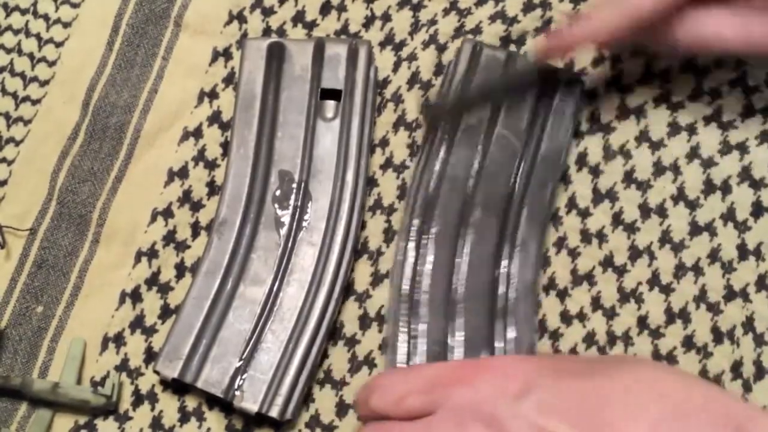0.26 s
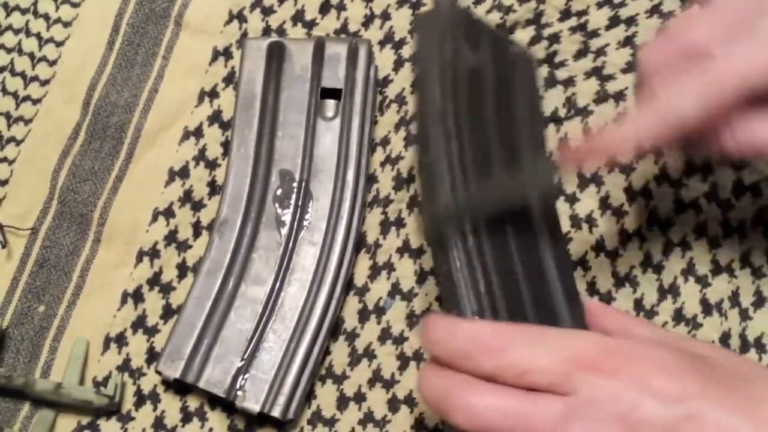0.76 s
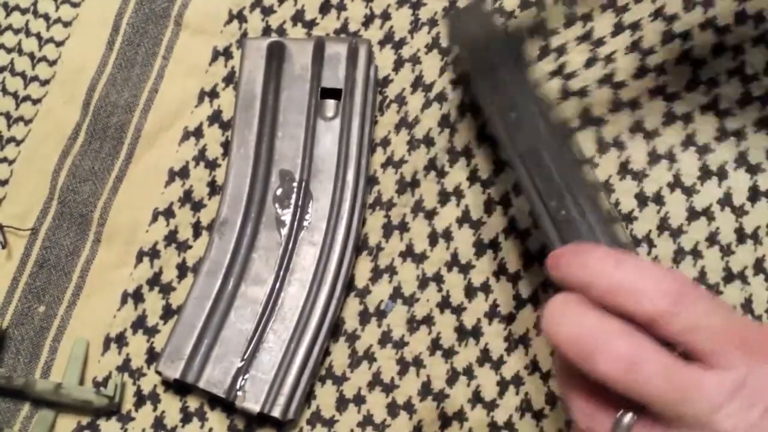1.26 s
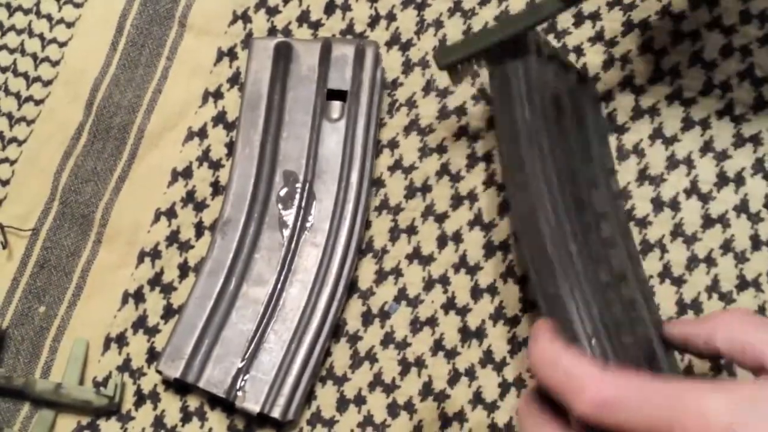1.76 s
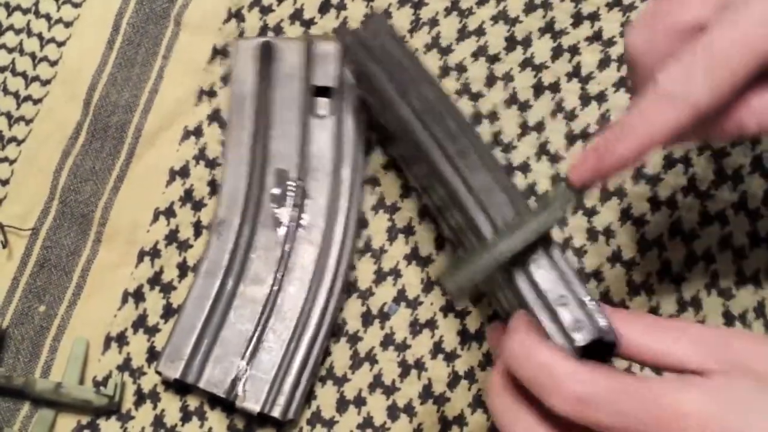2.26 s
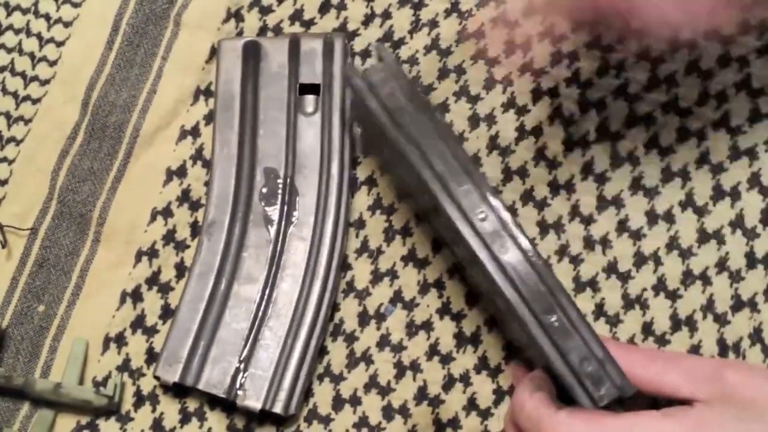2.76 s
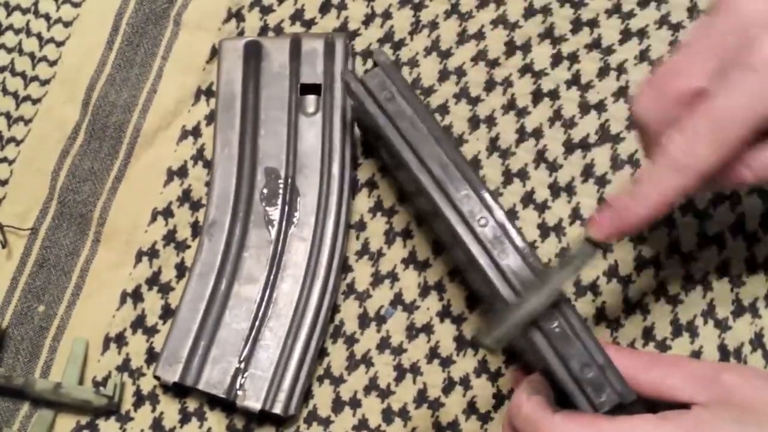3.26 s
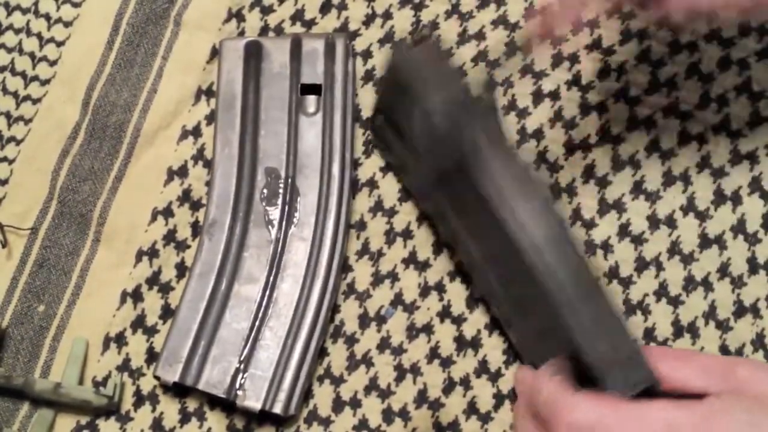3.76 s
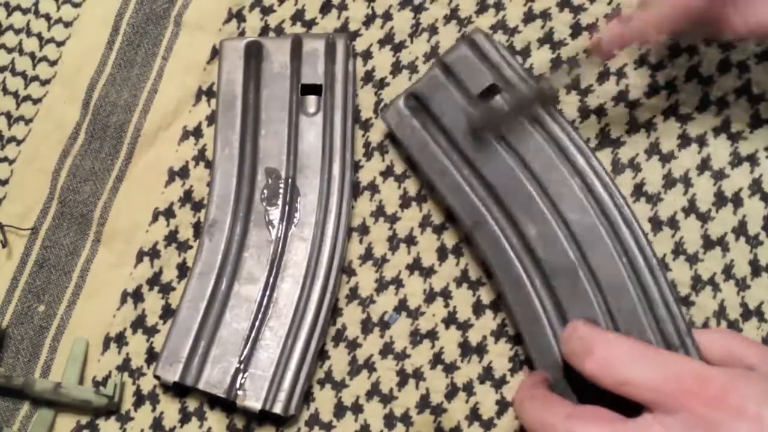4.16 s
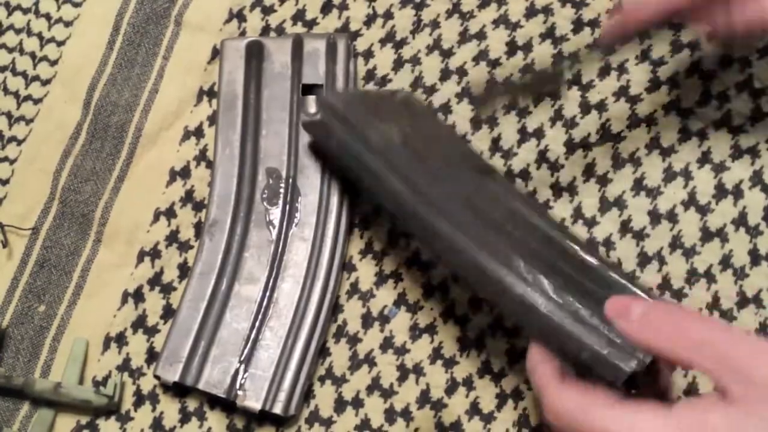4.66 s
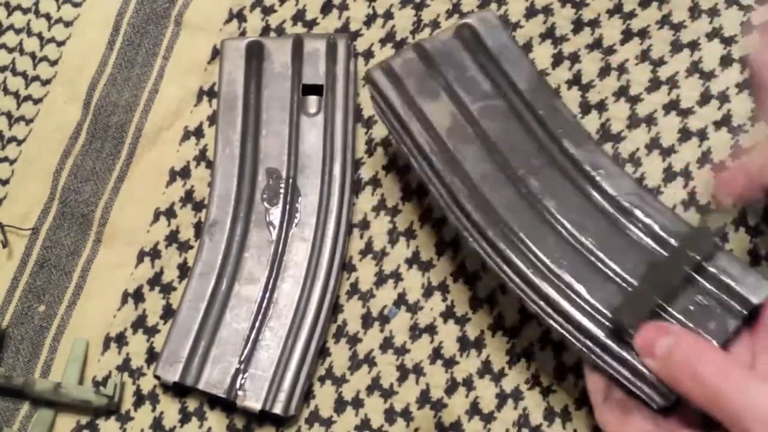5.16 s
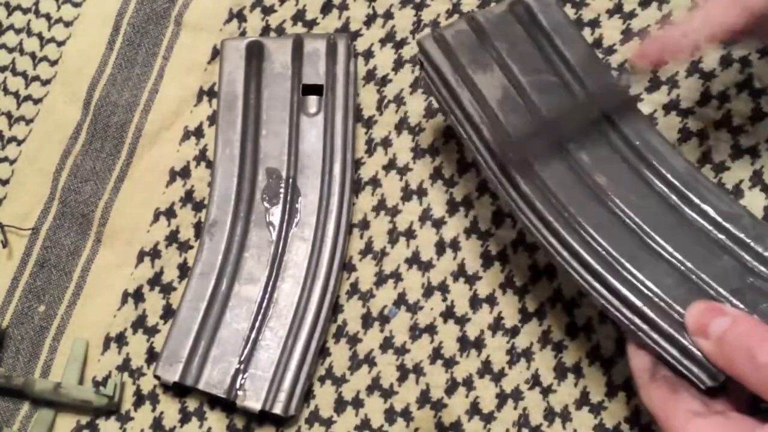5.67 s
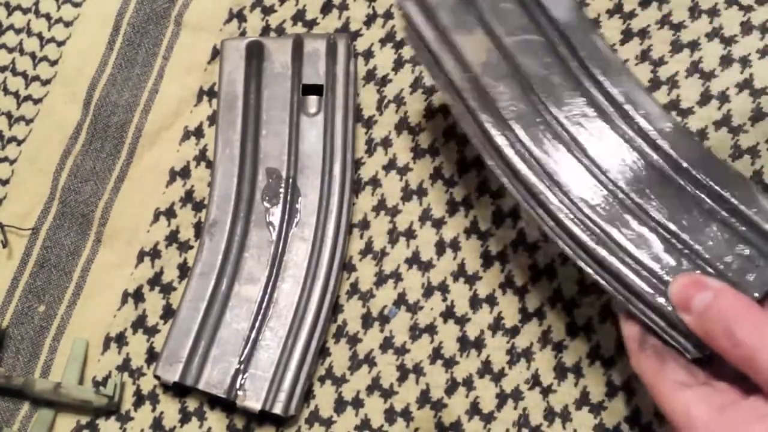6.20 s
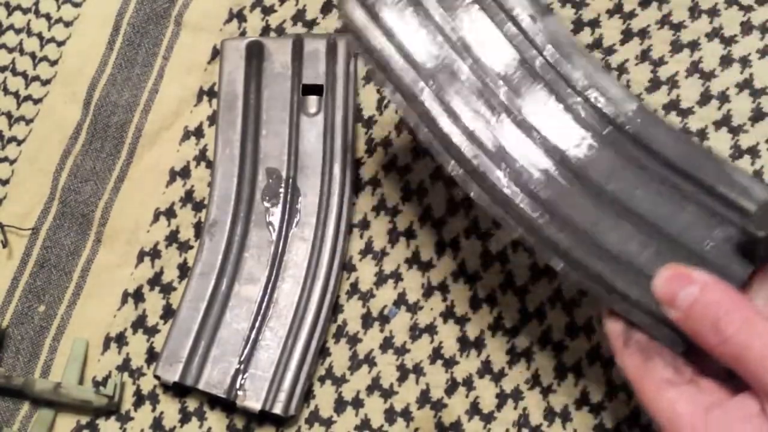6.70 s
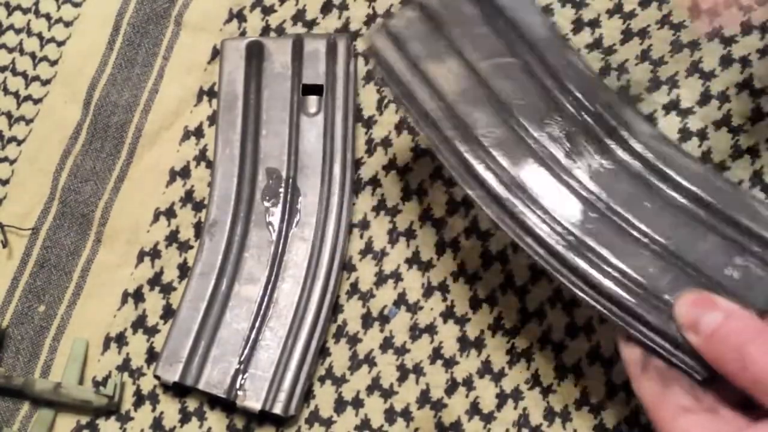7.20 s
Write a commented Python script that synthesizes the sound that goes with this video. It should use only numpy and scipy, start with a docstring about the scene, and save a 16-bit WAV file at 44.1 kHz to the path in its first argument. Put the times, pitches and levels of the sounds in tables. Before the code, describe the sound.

A stiff brush scrubs rapidly back and forth on a wet hollow metal case, with knocks, a clang and short clacks, close up indoors.

```python
"""Brushing a hollow metal magazine

A stiff brush scrubs a wet sheet-metal magazine, turned by hand on a cloth-covered table, in a small room.
Strokes are random bristle slips: each ticks and fizzes, and some ring the shell's modes (its ringing tones).
Short noise bursts make knocks and rim taps; coarser slips make drags. A second magazine clangs and grinds.
Around one clash the table thumps. Shaped noise makes its soft rumble and the faint room air.
A close stereo microphone hears it all, with a short room tail."""
import sys
import numpy as np
from scipy import signal
from scipy.fft import rfft, irfft
from scipy.io import wavfile

SR = 44100
rng = np.random.default_rng(int(sys.argv[2]) if len(sys.argv) > 2 else 0)


def unload_wav(signal):
    """Save mono or channel-first audio to the path in sys.argv[1] as 16-bit WAV at rate SR, clipped to [-1, 1]."""
    wavfile.write(
        sys.argv[1],
        SR,
        np.round(np.clip(np.atleast_2d(signal).T, -1, 1) * 32767).astype(np.int16),
    )


N = 328104  # length of the sound in samples
T = np.arange(N) / SR  # time in seconds


# brush strokes, each lasting until the next stroke or lift: (start [s], bristle hiss before trim [dB])
STROKE_STARTS = [(0.086, -37.5), (0.198, -36), (0.312, -38.5), (0.358, -27), (0.518, -33.5), (0.66, -33.5),
                 (0.821, -34.5), (0.957, -32.5), (1.106, -30.5), (1.246, -28.5), (1.404, -26.5),
                 (1.545, -32), (1.662, -36.5), (1.896, -51), (2.096, -45.5), (2.149, -53), (2.262, -29),
                 (2.381, -44), (2.557, -40.5), (2.683, -44.5), (2.831, -41.5), (2.957, -40.5),
                 (3.075, -35.5), (3.242, -45.5), (3.373, -33.5), (3.547, -31), (3.683, -31), (3.85, -47.5),
                 (4.148, -29), (4.306, -32.5), (4.448, -52), (4.788, -27.5), (4.905, -33), (5.035, -29.5),
                 (5.168, -34.5), (5.323, -29.5), (5.446, -39.5), (5.592, -28), (5.713, -34.5), (5.83, -22),
                 (6.016, -34.5), (6.183, -25), (6.693, -40.5), (6.852, -37.5), (6.952, -39.5),
                 (7.098, -34.5), (7.207, -38), (7.308, -36.5), (7.36, -26.5)]
# moments when the brush lifts off, so that the next stroke is a push: time [s]
BRUSH_LIFTS = [0.358, 1.876, 1.994, 2.215, 2.352, 3.829, 3.95, 4.57, 6.328, 6.848, 7.36, 7.458]
REVERSAL_S = 0.008  # the brush stands still between strokes


def strokes():
    """The hand goes to and fro: give the start, length, hiss level and direction of each stroke."""
    stops = [start for start, _ in STROKE_STARTS] + list(BRUSH_LIFTS)
    pushing = True
    for start, hiss_db in STROKE_STARTS:
        end = min(stop for stop in stops if stop > start)
        yield start, end - start - REVERSAL_S, hiss_db, pushing
        pushing = end in BRUSH_LIFTS or not pushing


# how freely the shell rings under the brush as the hand shifts its grip: (time [s], level [dB])
RING_FREEDOM = [(0.2, 3.5), (0.85, -5.5), (1.4, -3.5), (1.7, 5), (2.4, -10.5), (3.1, -1), (3.4, -13),
                (4.15, 1), (4.9, 0.5), (5.6, 2), (6.85, -2.5), (7.36, 2.5)]
# how strongly fine bristles excite each pitch, the high modes most: (frequency [Hz], level [dB])
FLICK_TONE = [(1000, -3), (1800, -0.5), (2800, 4), (5000, 6)]
# each way: swell from start to end [dB], shell ring over hiss before grip [dB], bite (under 1 peaks early)
PUSH, PULL = (-0.027, -2.3, 0.87), (0.76, -6.5, 0.77)
STROKE_ARCH = 0.95  # the force grows with the speed of the brush to this power
# a push with a knock this soon after its start fades by this much instead
LANDING_S, LANDING_SWELL_DB = 0.022, -12


def scrubbing(far_db=-10, spot_count=3, hiss_trim_db=-1.5, ringing_share=0.14):
    """Back and forth strokes: all slips hiss in the air, and a random share of them rings the shell."""
    out = np.zeros((2, N))
    for start, length, hiss_db, pushing in strokes():
        swell_db, ring_db, bite = PUSH if pushing else PULL
        if pushing and any(start < knock[0] < start + LANDING_S for knock in KNOCK_EVENTS):
            swell_db = LANDING_SWELL_DB
        free_db = value_at(RING_FREEDOM, start)
        force = friction(length, swell_db, rate=6000, grain_db=1.5, catch_db=1.6,
                         arch=STROKE_ARCH, bite=bite, catch_rate=211.5)
        # the tufts flutter as they cross the ribs
        flutter = undb(1.3 * wander(T[:len(force)], rate=55))
        force = force * flutter

        # the far row of bristles catches along with the near one, but flicks on its own
        near_hiss = bristles(force, length)
        far_force = force * rng.standard_normal(len(force))
        far_hiss = bristles(far_force, length, spot_count=1)
        hiss = near_hiss + undb(far_db) * far_hiss
        add(out, start, level(hiss, hiss_db + hiss_trim_db, length))

        # the ring shifts as the brush travels, and follows the flutter more than the hiss does
        times = np.linspace(start, start + length, spot_count)
        spots = [shell(time, scatter_db=3, panel_db=-14) for time in times]
        rings_shell = rng.random(len(force)) < ringing_share
        metal = sliding(force * flutter * rings_shell, length, spots)
        metal = colour(metal, FLICK_TONE)
        add(out, start, level(metal, hiss_db + ring_db + free_db, length))
    return out


# spectrum of the bristles: (frequency [Hz], level [dB per Hz])
BRISTLE_TONE = [(500, -55), (900, -32.5), (2300, -14), (3000, -10), (3600, -32), (4200, -5), (5300, -6),
                (6300, -1.5), (8000, 3), (9200, -1.5), (10500, -4.5), (12500, -9), (15200, -15),
                (16500, -35)]


def bristles(force, length, snap_db=-8, spot_count=2):
    """Each bristle snaps free with a tick and sets the thin wall fizzing, differently at each spot."""
    t = T[:SR // 30]
    fizz = [pair(len(t), spread=1) * decay(t, t60=0.025) for _ in range(spot_count)]
    fizz = [spot / np.linalg.norm(spot[0]) for spot in fizz]
    ticks = undb(snap_db) * force
    return colour(ticks + sliding(force, length, fizz), BRISTLE_TONE)


def friction(length, swell_db, rate, grain_db, catch_db, arch=0.46, bite=0.74, catch_rate=130):
    """Force of one sliding pass: chance slips, stronger or weaker as the contact catches and lets go."""
    t = T[:SR // 3]
    travel = np.minimum(t / length, 1)
    speed = abs(np.sin(np.pi * travel ** bite))  # the hand sets off quickly and coasts to rest
    happens = rng.random(len(t)) < rate / SR  # rate: slips per second
    slips = happens * rng.standard_normal(len(t))
    slips = slips * undb(grain_db * rng.standard_normal(len(t)))  # uneven sizes
    return slips * speed ** arch * undb(swell_db * travel + catch_db * wander(t, catch_rate))


# the hand turns the shell under the brush: (time [s], place [-1 open rim, 0 broad face, 1 narrow spine])
# places beyond the rim or spine count as the rim or spine
SHELL_TURN = [(0.1, 0.11), (0.6, -0.51), (1.1, 1), (1.8, 0.82), (2.7, 0.66), (3.16, 0.0083), (3.9, 0.22),
              (4.25, -0.68), (4.8, -0.034), (6.0, -0.1), (6.3, -1.2), (6.9, -1.27), (7.4, -0.51)]
# ringing modes of the held shell, before damping and detuning:
# (frequency [Hz], time to fall 60 dB [s], level from rim [dB], from face [dB], from spine [dB])
SHELL_MODES = [(770.5, 0.093, -1, -1.5, -7), (799.7, 0.11, 4, 4, 1.5), (868, 0.061, -5, 5, -26),
               (950, 0.017, -54, 7, -10), (967, 0.065, 7, 2.5, -10), (1026, 0.056, -2, 4, 7.5),
               (1291, 0.094, 4.5, -12, -38), (1310, 0.059, 7.5, -1.5, -28.5), (1460, 0.027, -8, -7.5, -47),
               (1621, 0.088, -3.5, -7, -28), (1792, 0.041, -1, 2, -12), (1810, 0.011, -3, -7, -29),
               (2034, 0.05, -0.5, 0.5, -1.5), (2604, 0.061, -4.5, -4, 2), (2830, 0.019, 2.5, -5.5, -7),
               (2970, 0.077, 2.5, -4.5, -9.5), (2956, 0.051, -4.5, -23, -5.5), (3235, 0.08, -2, -4, -2),
               (3977, 0.062, -6, -1, -8), (4510, 0.08, -6, -16, 5.5), (5176, 0.12, 3, -10, -15.5),
               (5336, 0.052, 4.5, -3, 3)]


def shell(time, scatter_db=-1.4, panel_db=-6):
    """The held magazine: rim, face and spine each bring out other modes."""
    hz, t60, *place_db = np.transpose(SHELL_MODES)
    place = np.clip(value_at(SHELL_TURN, time), -1, 1)
    shares = np.maximum(1 - abs(place - np.array([-1, 0, 1])), 0)
    power = shares @ undb(place_db) ** 2
    return sheet_metal(hz, t60, power, scatter_db=scatter_db, panel_db=panel_db)


# spectrum of the thin panels: (frequency [Hz], level [dB per Hz])
PANEL_TONE = [(300, -16), (550, -56.5), (760, 4), (1900, -4), (2350, -13), (5200, 9.5), (12000, -17.5)]


def sheet_metal(hz, t60, power, scatter_db=-2.3, spread=0.52, panel_db=-5, panel_t60=0.2):
    """Response of a magazine at one spot: its strong modes plus a dense, short ring of the panels."""
    t = T[:SR // 7]
    # the wet film damps the high modes, hand and cloth the low
    t60 = np.minimum(t60, np.minimum(330 / hz, 0.1))
    size, lag, lean, grip = rng.standard_normal((4, len(hz)))
    # fingers and brush detune the walls, the high modes most
    hz = hz * (1 + 0.013 * grip * np.minimum(hz / 3000, 1))
    gain = np.sqrt(power / t60) * undb(scatter_db * size)
    waves = np.exp((2j * np.pi * hz - np.log(1000) / t60)[:, None] * t)
    # each mode radiates with its own phase and strength to either side
    side_shift = np.outer([1, -1], spread * (1j * lag + lean / 2))
    sides = np.exp(side_shift * np.minimum(hz / 1500, 1))
    signs = rng.choice([-1, 1], len(hz))
    modes = ((sides * gain * signs) @ waves).imag
    # so small a body radiates little bass
    modes = colour(modes, [(300, -40.5), (550, -8.5), (750, -2.0)])
    panels = colour(pair(len(t), spread=0.81) * decay(t, panel_t60), PANEL_TONE)
    return unit(modes) + undb(panel_db) * unit(panels)


# hard knocks on the shell: (time [s], shell ring before trim [dB], click before trim [dB])
KNOCK_EVENTS = [(0.092, -19, -16), (0.374, -20, -40), (0.536, -26, -42), (1.122, -28.5, -24),
                (1.265, -20.5, -20), (1.496, -42, -37), (1.571, -27, -18), (1.681, -26, -24),
                (2.229, -29, -11.5), (3.154, -18, -40), (3.561, -31.5, -45), (3.936, -31, -48),
                (4.185, -19, -35), (4.324, -15.5, -40), (4.639, -9, -19), (4.647, -14.5, -28),
                (4.681, -18, -21.5), (4.71, -9.5, -12), (4.786, -20, -13.5), (4.825, -12, -20),
                (4.843, -9.5, -10), (4.921, -28, -18), (5.046, -22.5, -48), (5.336, -36, -28),
                (6.512, -35, -34), (6.699, -36.5, -31), (7.373, -26, -31)]
# spectrum of the click of a knock: (frequency [Hz], level [dB per Hz])
CLICK_TONE = [(400, -5), (900, -29), (1700, -13), (2400, 9.5), (5300, 11), (8500, 16.5), (11000, 1.5),
              (16000, -29)]


def knocking(contact_t60=0.0048, click_t60=0.0114, chatter_s=0.0044, ring_trim_db=-2.0, click_trim_db=-4.5):
    """A knock is a brief chatter of contacts; the pressing hand chokes the ring."""
    out, t = np.zeros((2, N)), T[:SR // 4]
    for time, ring_db, click_db in KNOCK_EVENTS:
        force = rng.standard_normal(len(t)) * decay(t, contact_t60)
        force[0] += 12  # an extra push at the first touch
        click_fade = decay(np.maximum(t - chatter_s, 0), click_t60)  # steady chatter, then a fall
        click = colour(pair(len(t), spread=0.54) * click_fade, CLICK_TONE)
        metal = ring(force, shell(time)) * decay(t, t60=0.25)
        add(out, time, level(metal, ring_db + ring_trim_db, seconds=0.0031))
        add(out, time, level(click, click_db + click_trim_db, seconds=0.0049))
    return out


# brush head or metal dragging on the shell:
# (start [s], end [s], shell ring [dB], corner above which the contact is dull [Hz])
DRAG_EVENTS = [(0.096, 0.133, -30, 3020), (0.368, 0.44, -29, 2000), (3.836, 3.953, -35.5, 1850),
               (3.973, 4.107, -46, 1270), (4.184, 4.284, -26, 6000), (4.229, 4.274, -17.5, 1330),
               (6.234, 6.258, -28.5, 880), (6.252, 6.277, -21, 4000), (4.847, 4.887, -24, 7000),
               (6.396, 6.446, -32.5, 7000)]


def dragging():
    """Something hard chatters over the shell in coarse slips."""
    out = np.zeros((2, N))
    for start, end, ring_db, corner_hz in DRAG_EVENTS:
        length = end - start
        force = friction(length, 0, rate=1800, grain_db=3, catch_db=3.0)
        spots = [shell(time, panel_db=-8) for time in (start, end)]
        sound = colour(sliding(force, length, spots), [(corner_hz, 0), (4 * corner_hz, -24)])
        add(out, start, level(sound, ring_db, length))
    return out


# the open rim taps the lying magazine: (time [s], level [dB], corner above which the tap is dull [Hz])
RIM_TAPS = [(6.288, -14.5, 5000), (6.328, -13, 6500), (6.3955, -7.5, 8000), (6.4335, -13.5, 3500)]


def tapping(contact_s=0.0015, choke_t60=0.04, click_db=-5):
    """Rim on metal: a crisp, thin clack that the contact itself chokes at once."""
    out, t = np.zeros((2, N)), T[:SR // 8]
    contact = t / contact_s * np.exp(-t / contact_s)
    for time, tap_db, corner_hz in RIM_TAPS:
        force = rng.standard_normal(len(t)) * contact
        clack = unit(ring(force, shell(time)) * decay(t, choke_t60))
        click = unit(pair(len(t), spread=1) * contact)
        tone = [(750, -11), (1200, 0), (2200, -7), (2900, 1), (corner_hz, 0), (2 * corner_hz, -12)]
        sound = colour(clack + undb(click_db) * click, tone)
        add(out, time, level(sound, tap_db, seconds=4 * contact_s))
    return out


# the held magazine meets the lying one: (start [s], end [s], clang [dB], grinding [dB])
CLASH_EVENTS = [(2.228, 2.349, -10.5, -20), (4.638, 4.692, -22.5, -34)]
# modes of the lying magazine, before damping and detuning:
# (frequency [Hz], time to fall 60 dB [s], level [dB])
LYING_MODES = [(957, 0.097, 0.5), (988, 0.054, 0), (1640, 0.033, -10), (1800, 0.013, 0), (1992, 0.068, 1.5),
               (2077, 0.05, 1), (2920, 0.025, -1.5), (3447, 0.051, 1), (3950, 0.054, -3),
               (4540, 0.05, -9.5), (5330, 0.031, 1.5), (5790, 0.05, -7.5)]


def clashing(contact_t60=0.04, shift_db=5.0):
    """The held magazine hits the lying one with a dense clang, then grinds from low modes to higher ones."""
    out, t = np.zeros((2, N)), T[:SR // 4]
    hz, t60, mode_db = np.transpose(LYING_MODES)
    for start, end, clang_db, grind_db in CLASH_EVENTS:
        length = end - start
        blow = rng.standard_normal(len(t)) * decay(t, contact_t60)
        struck = sheet_metal(hz, t60, undb(mode_db) ** 2, panel_db=0.0)
        clang = ring(blow, struck) * decay(t, t60=0.053)
        add(out, start, level(clang, clang_db, seconds=0.015))

        slide = friction(length, 0, rate=2200, grain_db=4, catch_db=4.0, arch=0.55, bite=0.42)
        upper = np.where(hz > hz[1], 1, -1)  # the lowest pair of modes against the rest
        tilts_db = [mode_db + way * shift_db * upper for way in (-1, 1)]
        spots = [sheet_metal(hz, t60, undb(db) ** 2, panel_db=-8.5) for db in tilts_db]
        add(out, start, level(sliding(slide, length, spots), grind_db, length))
    return out


# the magazine drops on the table: (time [s], level [dB])
TABLE_THUMPS = [(2.231, -25), (2.3153, -11), (2.343, -23)]
# ringing modes of the table top: (frequency [Hz], time to fall 60 dB [s], level [dB])
TABLE_MODES = [(98.3, 0.99, -3.5), (133.6, 0.39, 4), (194, 0.19, 5), (237.3, 0.31, 2.5), (273.2, 0.21, -5),
               (552, 0.031, 1.5), (822, 0.036, 0), (867, 0.028, -3)]
# force spectrum of the dropped metal: (frequency [Hz], level [dB per Hz])
DROP_TONE = [(100, -37), (200, -34), (280, 5.5), (1500, 4), (4000, 1)]
# weight of the hands on the table: (time [s], rumble before trim and jolts [dB])
HAND_WEIGHT = [(0.0, -34), (2.18, -36), (2.22, -46), (2.76, -47), (3.96, -32.5), (5.51, -44), (6.15, -35),
               (6.92, -46.5), (7.44, -38)]
# force spectrum of soft hands on the cloth: (frequency [Hz], level [dB per Hz])
CLOTH_TONE = [(20, -20), (52, -12.5), (68, -5.5), (120, -2), (230, -2.5), (340, -6.5), (500, -14),
              (900, -20.5), (2000, -35.5)]


def table(rustle_db=-1, jolt_db=1.5, jolt_rate=18, rumble_trim_db=-0.44):
    """Dull thumps of the top, and the uneven rumble of hands and metal shifting on the cloth."""
    out, t = np.zeros((2, N)), T[:SR // 3]
    top = sum(undb(db) * np.sin(2 * np.pi * hz * t) * decay(t, t60) for hz, t60, db in TABLE_MODES)
    for time, thump_db in TABLE_THUMPS:
        add(out, time, level(colour([top, top], DROP_TONE), thump_db, seconds=0.00262))
    rub = colour(pair(N, spread=0.0195), CLOTH_TONE)
    resonance = unit(ring(rub, top))
    rustle = unit(colour(pair(N, spread=0.22), CLOTH_TONE))
    rumble = unit(resonance + undb(rustle_db) * rustle)
    rumble_db = value_at(HAND_WEIGHT, T) + jolt_db * wander(T, jolt_rate) + rumble_trim_db
    return out + rumble * undb(rumble_db)


# spectrum of the room air: (frequency [Hz], level [dB per Hz])
AIR_TONE = [(120, -2), (400, 10.5), (2000, 8.5), (5000, 19.5), (16000, -8)]


def room_air(air_db=-57.5):
    """Faint steady air: shaped noise, independent left and right in strength and phase."""
    return unit(colour(pair(N, spread=1.0), AIR_TONE)) * undb(air_db)


def room(x, t60=0.35, treble_t60=0.24, wet_db=-12.3, gap_s=0.0036):
    """Short diffuse tail of a furnished room; the treble dies first."""
    t = T[:SR // 2]
    noise = rng.standard_normal((2, len(t)))
    low = signal.sosfiltfilt(signal.butter(2, 7000, fs=SR, output="sos"), noise)
    treble = noise - low
    tail = (low * decay(t, t60) + treble * decay(t, treble_t60)) * (t > gap_s)
    wet = ring(x, tail / np.linalg.norm(tail[0]))
    wet = colour(wet, [(200, -12.0), (1000, 5.5), (5000, 3), (9000, 1.5), (15000, 4.5)])
    return x + undb(wet_db) * wet


def sliding(force, length, spots):
    """The contact travels over the metal, handing the force from one spot's response to the next."""
    along = np.minimum(T[:len(force)] / length, 1) * (len(spots) - 1)
    shares = [np.sqrt(np.maximum(1 - abs(along - k), 0)) for k in range(len(spots))]
    return sum(ring(force * share, spot) for share, spot in zip(shares, spots))


def wander(t, rate):
    """Random values, so many a second, joined by straight lines."""
    return np.interp(t * rate, np.arange(len(t)), rng.standard_normal(len(t)))


def ring(x, response):
    """Let a force set off a response at every moment (convolution)."""
    return signal.fftconvolve(np.atleast_2d(x), np.atleast_2d(response), axes=-1)[:, :np.shape(x)[-1]]


def colour(x, points, size=2048):
    """Filter to the given spectrum without sounding ahead of time (minimum phase)."""
    cepstrum = irfft(np.log(undb(contour(points, np.fft.rfftfreq(size, 1 / SR)))))
    cepstrum[1:size // 2] *= 2
    cepstrum[size // 2 + 1:] = 0
    return ring(x, irfft(np.exp(rfft(cepstrum))))


def contour(points, hz):
    """Read (Hz, dB) points on a log-frequency axis."""
    f, db = np.transpose(points)
    return np.interp(np.log(hz + 1), np.log(f), db)


def value_at(rows, time):
    """Read (s, value) rows joined by straight lines."""
    return np.interp(time, *np.transpose(rows))


def decay(t, t60):
    """Exponential fall of 60 dB in t60 seconds."""
    return np.exp(-np.log(1000) * t / t60)


def pair(n, spread):
    """Left and right noise from a shared middle and an opposed side."""
    mid, side = rng.standard_normal((2, n))
    return np.array([mid + spread * side, mid - spread * side])


def undb(db):
    """Decibels to gain."""
    return 10 ** (np.asarray(db) / 20)


def unit(x):
    """Scale to an average strength (rms) of 1."""
    return x / np.sqrt(np.mean(x ** 2) + 1e-18)


def level(x, db, seconds):
    """Set the rms that the centre of the stereo image has over the first seconds."""
    return x * undb(db) / np.sqrt(np.mean(x.mean(0)[:int(seconds * SR)] ** 2) + 1e-18)


def add(out, start, x):
    """Mix a sound in at its time."""
    i = max(int(start * SR), 0)
    out[:, i:i + x.shape[1]] += x[:, :N - i]


def scene():
    """All the work on the table, over faint room air."""
    air = room_air()
    work = scrubbing() + dragging() + knocking() + tapping() + clashing() + table()
    return room(work) + air


# microphone tone, left minus right: (frequency [Hz], level [dB])
MIC_BALANCE = [(200, 0), (750, 2.5), (1300, -1), (2600, 1), (5400, 1.5), (6500, -6), (8000, -17),
               (15000, -10.5)]
TOP_HZ = 15900  # the microphone cuts off above this


def record(dry, delay_samples=4):
    """The right port faces the work: it hears sooner and brighter. Peaks clip and the top is cut."""
    hz = np.fft.rfftfreq(N, 1 / SR)
    lean = undb(contour(MIC_BALANCE, hz))
    left = lean * np.exp(-2j * np.pi * hz * delay_samples / SR)
    right = np.ones(len(hz))
    ports = np.array([left, right]) * 2 / (1 + lean)
    heard = np.clip(irfft(rfft(dry) * ports, N), -1, 1)
    return signal.sosfilt(signal.ellip(8, .2, 70, TOP_HZ, fs=SR, output="sos"), heard)


dry = scene()
out = record(dry)
unload_wav(out)
```